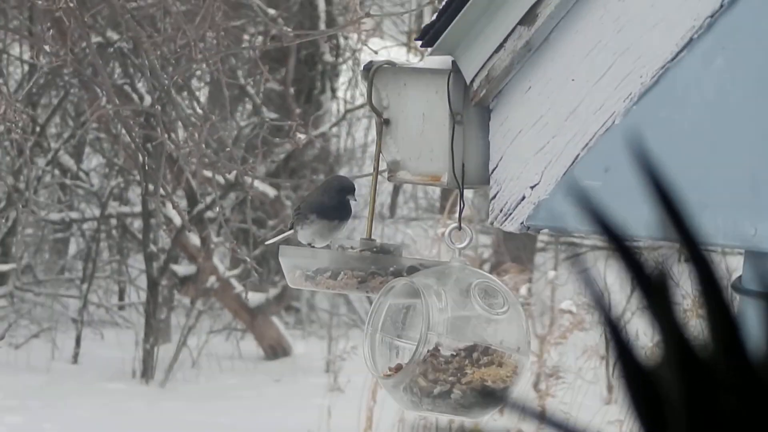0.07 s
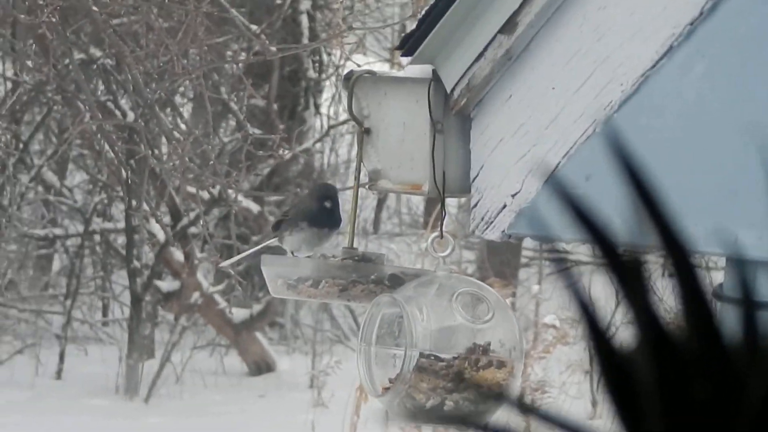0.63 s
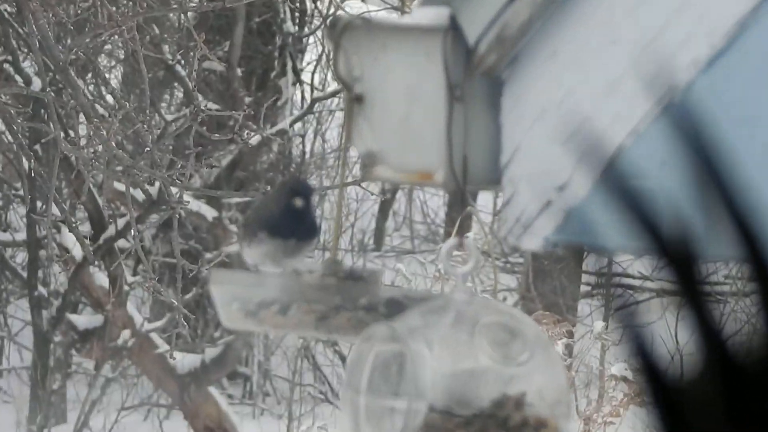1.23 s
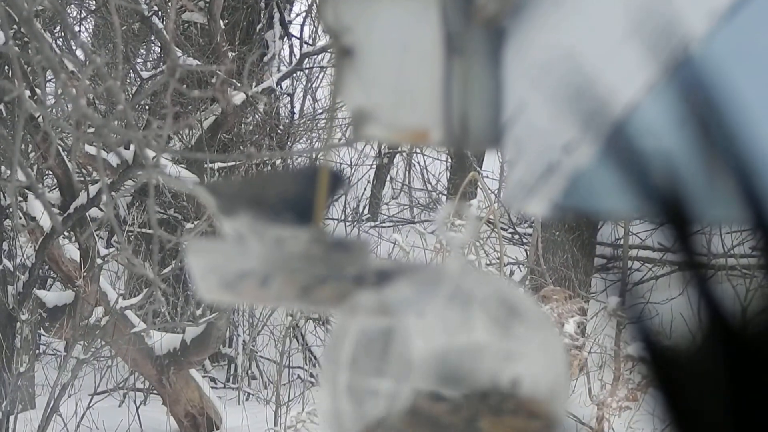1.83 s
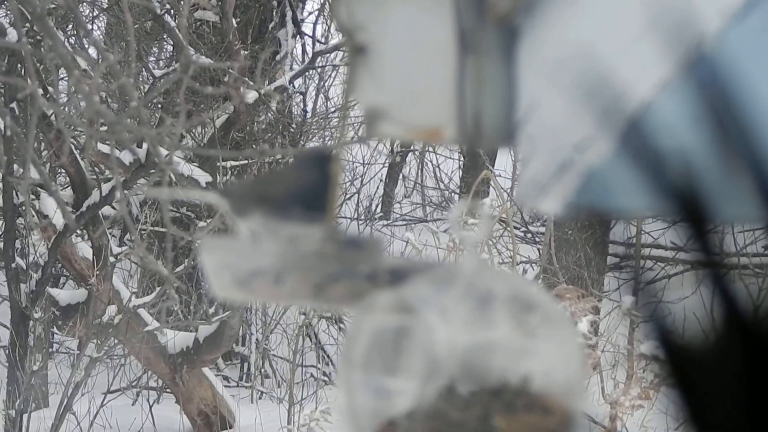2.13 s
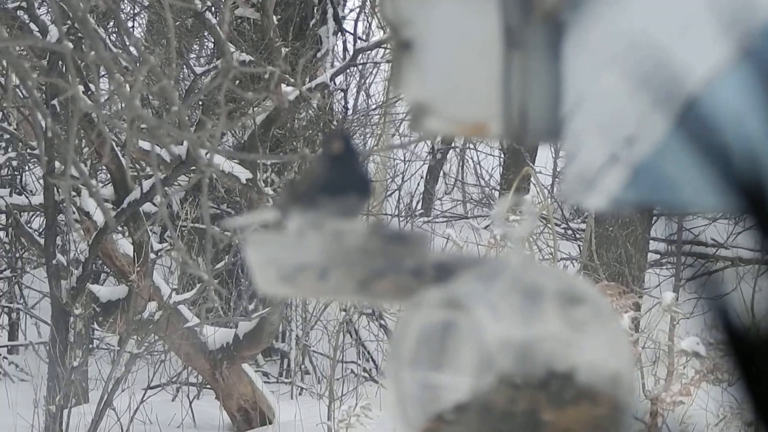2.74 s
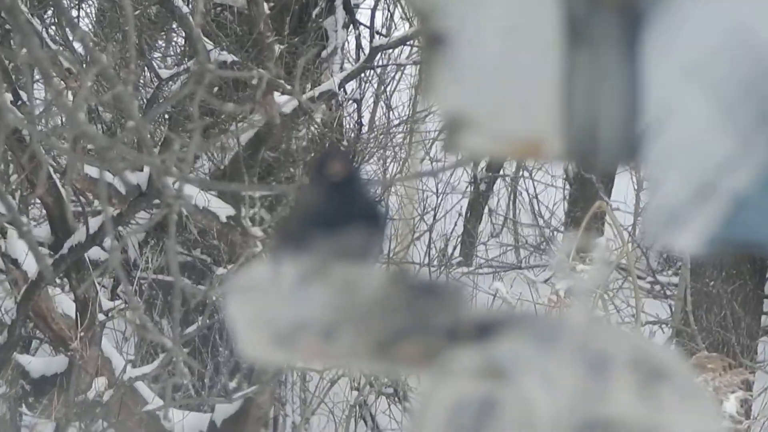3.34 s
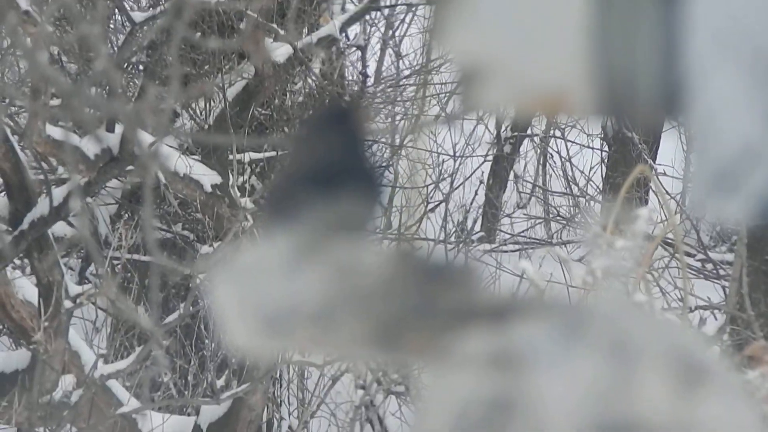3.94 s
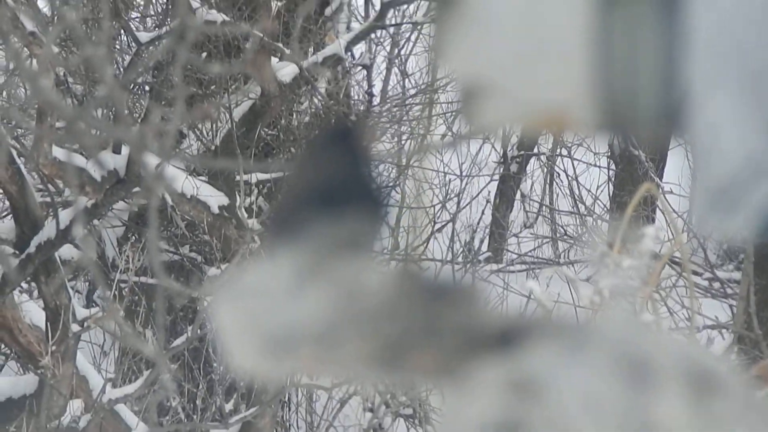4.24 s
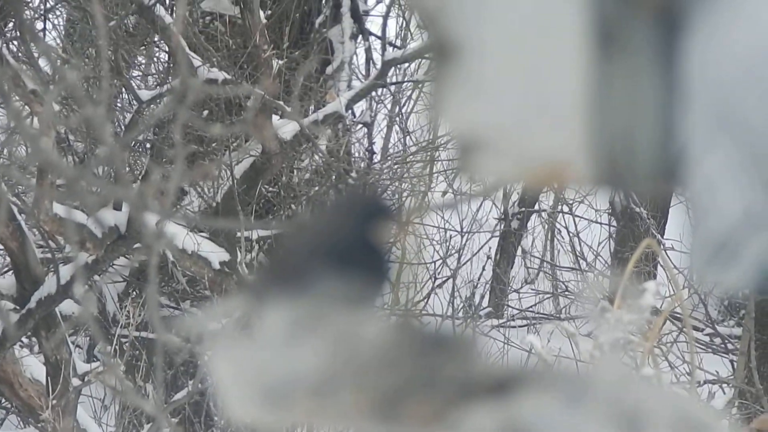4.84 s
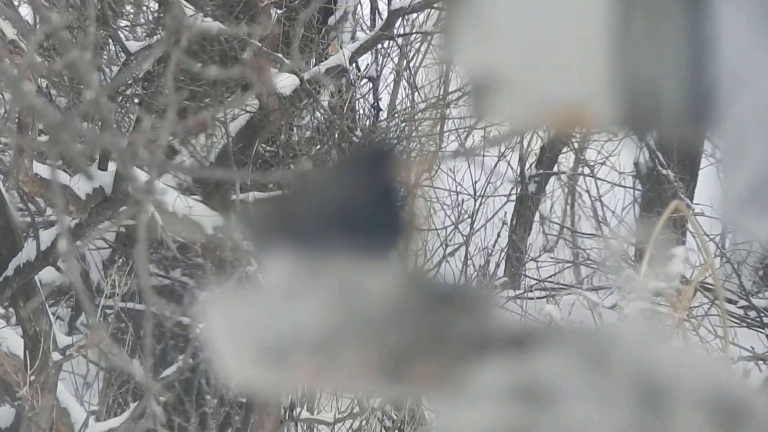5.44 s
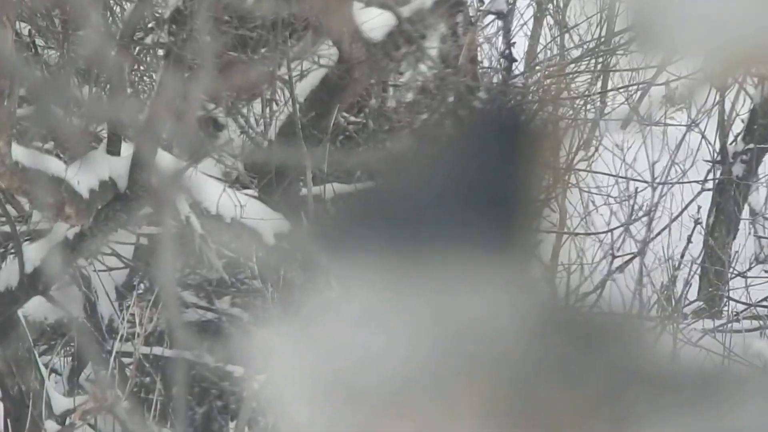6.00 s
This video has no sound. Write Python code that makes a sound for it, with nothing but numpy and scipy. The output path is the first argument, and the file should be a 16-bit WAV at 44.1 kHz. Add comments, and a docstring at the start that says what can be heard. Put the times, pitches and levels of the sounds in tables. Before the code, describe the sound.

Fingers grip a camera indoors, making its plastic body give dry, irregular clicks right at the microphone. Twice, a soft bump, a light rub of skin and a barely audible zoom whir come just before a sharp crack. Scattered small ticks follow, and one more faint whir and loud crack come near the end. Low room hiss and hum run underneath, dropping briefly at the loudest cracks.

```python
"""In a quiet room, someone grips a handheld camera and zooms its lens.
Over a soft hiss and hum, the plastic shell ticks and cracks as its seams slip under the fingers.
Skin rubs on the shell, the hand bumps it, and the lens motor whirs faintly three times.
The camera's limiter (an automatic volume control) turns everything down at each loud crack,
so the room noise drops and then swells back."""
import sys
import numpy as np
from scipy import signal
from scipy.fft import rfft, irfft
from scipy.io import wavfile
from scipy.ndimage import uniform_filter1d

SR = 44100
rng = np.random.default_rng(int(sys.argv[2]) if len(sys.argv) > 2 else 0)


def put_to_file(sound):
    """Save the sound as 16-bit audio at rate SR, in the file named by the first command-line argument."""
    columns = np.atleast_2d(sound).T  # one column per channel
    safe = np.clip(columns, -1, 1)
    whole_steps = np.round(safe * 32767)
    wavfile.write(sys.argv[1], SR, whole_steps.astype(np.int16))


N = 267598
TIME = np.arange(N) / SR
FREQS = np.fft.rfftfreq(N, 1 / SR)


def amp(db):
    """Turns decibels into a number to multiply by."""
    return 10 ** (np.asarray(db) / 20)


def unit(x):
    """Scales a signal to an average strength (rms) of 1."""
    return x / np.sqrt(np.mean(x ** 2) + 1e-20)


def read(points, hz):
    """Reads a curve drawn through (frequency [Hz], value) points, with octaves evenly spaced."""
    f, value = np.transpose(points)
    return np.interp(np.log(hz + 1), np.log(f + 1), value)


def peak(hz, centre_hz, width_hz):
    """The power curve of a resonance (a pitch at which a thing likes to ring), 1 at its centre."""
    return 1 / (1 + (2 * (hz - centre_hz) / width_hz) ** 2)


def add(mix, s, sound):
    """Adds a stereo sound to the mix, s seconds in."""
    part = mix[:, max(round(s * SR), 0):][:, :sound.shape[1]]
    part += sound[:, :part.shape[1]]


def causal(gain):
    """Makes a filter with the given gains that rings only after a blow (minimum phase)."""
    cepstrum = irfft(np.log(gain + 1e-5))
    half = cepstrum.shape[-1] // 2
    cepstrum[..., 1:half] *= 2
    cepstrum[..., half + 1:] = 0
    return np.exp(rfft(cepstrum))


def noise(gain):
    """Stereo noise of strength 1 with the given gain at each frequency, partly alike in both ears."""
    # how alike left and right are: (frequency [Hz], likeness [0-1])
    likeness = [(30, 0.13), (300, 0.55), (1000, 0.24), (3000, 0.11), (12000, 0.27)]
    left, other = rfft(rng.standard_normal((2, N)))
    same = read(likeness, FREQS)
    right = same * left + np.sqrt(1 - same ** 2) * other
    return unit(irfft(np.array([left, right]) * gain, N))


def gate(start, end, fade_s):
    """Fades in at start and out at end."""
    return np.clip(np.minimum(TIME - start, end - TIME) / fade_s, 0, 1)


def background(air_db=-58, hum_hz=120, hum_db=-71):
    """Steady room and microphone noise, a weak hum of mains power and a few passing drones."""
    # tone of the steady noise: (frequency [Hz], relative level [dB])
    air_tone = [(12, -41), (20, -6), (43, -1), (116, -1), (262, -7), (357, -8.5), (410, -10), (574, -13.5),
                (1400, -17.5), (2460, -22), (2820, -22), (7520, -31.5), (9140, -32.5), (14700, -39),
                (16000, -43.5)]
    # faint drones: (start [s], end [s], pitch [Hz], width [Hz], level [dB])
    drone_spans = [(1.996, 2.717, 361, 34.5, -68), (2.424, 2.646, 1530, 300, -65),
                   (4.44, 4.77, 360, 50, -71)]
    air = amp(air_db) * noise(amp(read(air_tone, FREQS)))
    hum = amp(hum_db) * np.sqrt(2) * np.sin(2 * np.pi * (hum_hz * TIME + rng.random()))
    drones = sum(amp(db) * gate(start, end, fade_s=0.1) * noise(peak(FREQS, hz, width))
                 for start, end, hz, width, db in drone_spans)
    return air + hum + drones


def seam_slip(s, db, tilt_db, cut_hz, spot, size=2048):
    """A seam creeps under load, slips in a burst of tiny impacts and rattles. Gives (start, sound)."""
    # tone that the shell gives every click: (frequency [Hz], relative level [dB])
    shell_tone = [(60, -2), (300, -5.5), (600, -10.5), (950, -2), (1400, 1.5), (2100, 7), (3000, -0.5),
                  (3700, -2), (4300, -1), (6000, 0), (7300, 5), (8900, -3), (12000, -2), (15500, -13.5)]
    # resonances of the shell's panel, lowest first: (pitch [Hz], width [Hz], greatest boost [dB])
    panel_modes = [(925, 590, 10.5), (1770, 360, 11.5), (3130, 1100, 11.5), (4200, 370, 10), (8120, 430, 9),
                   (9210, 780, 11)]
    lead_s, build_s, creep_s, creep_share = 0.008, 0.00049, 0.0023, 0.26
    slip_s, rattle_s, rattle_share = 0.00053, 0.0044, 0.14
    t = np.arange(size) / SR - lead_s
    hz = np.fft.rfftfreq(size, 1 / SR)
    creep = creep_share * amp(db) * np.exp(-abs(t) / creep_s)  # more load, more creep
    build = np.maximum(np.exp(-abs(t) / build_s), creep)
    rattle = rattle_share * np.exp(-abs(t) / rattle_s)
    release = (np.exp(-abs(t) / slip_s) + rattle) / (1 + rattle_share)
    shared, *own = rng.standard_normal((3, size))  # each microphone has its own path through the shell
    burst = rfft((shared + np.array(own)) * np.where(t < 0, build, release))
    burst /= np.sqrt(uniform_filter1d(abs(burst) ** 2, size=60, axis=1))  # even out lows and highs
    # the spot that slips decides which resonances ring
    modes_db = sum(boost * np.cos(np.pi * k * spot) ** 2 * peak(hz, centre, width)
                   for k, (centre, width, boost) in enumerate(panel_modes, 1))
    octaves = np.log2(np.maximum(hz, 1000) / 4000)  # the tilt pivots at 4000 Hz
    tone = amp(read(shell_tone, hz) + modes_db + tilt_db * octaves)
    tone /= np.sqrt(1 + (hz / cut_hz) ** 12)  # steep treble cut
    lag = np.exp(-2j * np.pi * hz * np.array([[0], [0.00022]]))  # the left microphone hears it first
    fade = np.minimum(np.linspace(2, 0, size), 1) ** 2
    sound = irfft(burst * causal(tone) * lag) * fade
    # db is the level the click would have if packed into one millisecond
    return s - lead_s, amp(db) * unit(sound) * np.sqrt(SR / 1e3 / size)


def shell_clicks(left_db=1.0, right_db=0.0):
    """The gripped shell ticks and cracks; most clicks are followed by a weaker, duller second slip."""
    # slips of the seams: (time [s], level [dB], tilt toward treble [dB per octave],
    # treble cut-off [Hz], spot along the panel [0-1], strength of the second slip [0-1])
    clicks = [(0.2229, -29, 0, 10100, 0.47, 0.07), (0.339, -43, 1, 9550, .46, 0.4),
              (0.5407, -26.5, 1.5, 10300, .27, 0.4), (0.552, -14, 3.5, 9300, 0.21, 0.07),
              (0.688, -19.5, 1.5, 10200, .22, 0.19), (0.779, -38.5, 10, 16000, 0.27, 0.0027),
              (0.7952, -43.5, -0.5, 10200, 0.21, 0.45), (1.355, -7, 3.5, 11800, 0.24, 0.3),
              (1.4931, -35, 1, 13700, .05, .15), (1.581, -45, -6.5, 16000, 0.1, 0.43),
              (2.002, -37, 0, 10200, 0.27, 0), (2.0179, -26, 2, 11100, 0.44, 0.51),
              (2.285, -43, -0.5, 8550, 0.25, 0.62), (2.385, -36.5, 2.5, 10500, 0.43, .1),
              (2.423, -47, -1, 16000, .38, 0.1), (2.6389, -29.5, 3, 8200, .16, 0),
              (2.814, -28, 4.5, 8700, .28, 0.07), (2.8275, -42.5, 2, 7500, .4, .4),
              (2.858, -40, 9, 14800, .18, 0), (3.3433, -41, 0, 16000, 0.05, 0.5),
              (3.3661, -37.5, 1.5, 11000, 0.26, .1), (3.3904, -4, 3.5, 13230, .5, 0.14),
              (3.7315, -46.5, -10.5, 16200, 0.28, 0), (4.3004, -40, -6, 12600, 0.31, .1),
              (4.4305, -29.5, 3, 10000, .36, 0.33), (4.7858, -32, 0, 9700, 0.19, 0.15),
              (5.139, -46.5, 7, 12700, 0.1, 0), (5.847, -46, -2, 16100, 0.13, 0),
              (5.886, -4, 4, 11400, 0.24, 0.33)]
    gap_s, load_gap_s, duller_db = 0.0037, 0.004, 3
    strays_per_s, stray_db, spread_db = 2.5, -55.5, 3
    out = np.zeros((2, N))
    for s, db, tilt_db, cut_hz, spot, again in clicks:
        add(out, *seam_slip(s, db, tilt_db, cut_hz, spot))
        second_s = s + gap_s + load_gap_s * amp(db)  # a louder crack leaves a longer gap
        start, second = seam_slip(second_s, db, tilt_db - duller_db, cut_hz, spot)
        add(out, start, again * second)
    # faint stray ticks at random times
    for when, softness, spot in rng.random((round(strays_per_s * N / SR), 3)):
        db = stray_db - spread_db * (2 * softness - 1)
        add(out, *seam_slip(when * N / SR, db, tilt_db=0, cut_hz=9200, spot=spot))
    return (out + room_echo(out)) * amp([[left_db], [right_db]])


def room_echo(x, ring_s=0.24, echo_db=-25, size=22050):
    """A small room answers the clicks with a faint echo that dies quickly."""
    t = np.arange(size) / SR
    tail = rng.standard_normal((2, size)) * amp(-60 * t / ring_s) * np.clip(t / 0.006, 0, 1)
    tail /= np.linalg.norm(tail[0])
    return amp(echo_db) * signal.fftconvolve(x, tail, axes=1)[:, :N]


def skin_rubs(rise_s=0.017, fade_db_per_s=64.5, release_s=0.018, grain_db=2, creak_db=-8):
    """Skin slides on the shell with a grainy hiss, and the panel creaks faintly."""
    # slides of the skin: (start [s], length [s], level [dB])
    slides = [(0.759, 0.064, -58), (0.971, 0.44, -55.5), (2.839, .05, -58.5), (3.145, 0.26, -56.5),
              (4.787, .04, -60), (5.138, 0.079, -61.5)]
    # tone of the hiss: (frequency [Hz], relative level [dB])
    hiss_tone = [(100, -14.5), (1500, 2.5), (3200, 0), (4500, -7), (6000, -16.5), (7500, -4), (8400, 0),
                 (10000, 0), (12000, -8.5), (15500, -16)]
    loudness = np.zeros(N)
    for start, length, db in slides:
        age = np.maximum(TIME - start, 0)
        slowing = amp(db - fade_db_per_s * age)  # quieter as the finger slows
        letting_go = np.exp(-np.maximum(age - length, 0) / release_s)
        loudness += slowing * np.minimum(age / rise_s, 1) * letting_go
    grain = amp(grain_db * unit(uniform_filter1d(rng.standard_normal(N), size=120)))
    creak = amp(creak_db) * noise(peak(FREQS, centre_hz=3200, width_hz=700))
    hiss = noise(amp(read(hiss_tone, FREQS)))
    return loudness * unit(grain) * (hiss + creak)


def hand_bumps(settle_db=-9, settle_slowdown=3, knock_hz=333, knock_ring_s=0.043, knock_db=5.5):
    """The hand bumps the camera and the palm settles; a sudden bump also knocks the hollow body."""
    # soft bumps: (time [s], level [dB], rise time [s], fade time [s])
    bumps = [(0.791, -59, 0.0037, 0.023), (0.981, -38.5, 0.0015, 0.044), (2.885, -55, 0.0028, 0.02),
             (3.146, -43, 0.018, 0.036), (3.2, -47.5, 0.009, 0.049)]
    # tone of a bump: (frequency [Hz], relative level [dB])
    bump_tone = [(20, -19.5), (90, 0), (230, -2), (340, -10.5), (460, -4.5), (700, -12.5), (850, -11.5),
                 (1300, -18.5), (2200, -26.5), (5000, -53.5), (16000, -75.5)]
    power, knock = np.zeros((2, N))
    for s, db, rise, decay in bumps:
        age = np.maximum(TIME - s, 0)
        fall = np.maximum(age - rise, 0) / decay
        settle = amp(settle_db) * np.exp(-fall / settle_slowdown)
        power += (amp(db) * np.minimum(age / rise, 1) * np.hypot(np.exp(-fall), settle)) ** 2
        suddenness = np.exp(-rise / 0.0022)  # a slow rise barely knocks
        ring = amp(db + knock_db - 60 * age / knock_ring_s)
        knock += suddenness * ring * np.sin(2 * np.pi * knock_hz * age)
    return np.sqrt(power) * noise(amp(read(bump_tone, FREQS))) + knock


def lens_motor(surge_db=5, surge_s=0.09, whine_db=-4):
    """The zoom motor and its gears make a thin whir and a high whine, strongest as each run starts."""
    # runs of the motor: (start [s], end [s], level [dB])
    zooms = [(1.0, 1.51, -70.5), (3.155, 3.66, -67), (5.466, 6.1, -71.5)]
    # resonances of the motor and gears: (pitch [Hz], width [Hz], relative level [dB])
    motor_modes = [(1000, 700, -8), (2230, 180, 5.5), (3000, 89, 7.5), (4480, 500, 1.5), (7900, 440, 2.5),
                   (8520, 530, -15.5), (9900, 820, -5), (11110, 380, -13.5)]
    drive = np.zeros(N)
    for start, end, db in zooms:
        surge = surge_db * np.exp(-abs(TIME - start) / surge_s)
        drive += amp(db + surge) * gate(start, end, fade_s=0.017)
    power = sum(amp(db) ** 2 * peak(FREQS, hz, width) for hz, width, db in motor_modes)
    whir = noise(np.sqrt(power))
    whine = amp(whine_db) * noise(peak(FREQS, centre_hz=8330, width_hz=800))
    return drive * (whir + whine)


def scene():
    """Everything that reaches the camera's two microphones."""
    return shell_clicks() + hand_bumps() + skin_rubs() + lens_motor() + background()


def record(dry, limit_db=-20.0, recovery_db_per_s=15, top_hz=16000):
    """The camera weakens four narrow bands, turns down loud moments and cuts the highest treble."""
    # narrow dips in the microphones' sound: (frequency [Hz], width [Hz], depth [0-1])
    notches = [(2510, 90, .7), (5010, 90, .75), (7520, 90, .75), (10020, 90, .75)]
    tone = np.prod([1 - depth * peak(FREQS, hz, width) for hz, width, depth in notches], axis=0)
    heard = irfft(rfft(dry) * causal(tone), N)
    power = uniform_filter1d((heard ** 2).mean(0), size=66)
    level_db = 10 * np.log10(abs(power) + 1e-12)
    # the limiter clamps down at once and lets go slowly
    recovery = recovery_db_per_s * TIME
    held_db = np.maximum.accumulate(level_db + recovery) - recovery
    over_db = np.maximum(held_db - limit_db, 0)
    limited = heard * amp(-uniform_filter1d(over_db, size=20))
    treble_cut = signal.firwin(255, top_hz, window=("kaiser", 8), fs=SR)
    return signal.oaconvolve(limited, treble_cut[None], "same", axes=1)


dry = scene()
out = record(dry)
put_to_file(out)
```